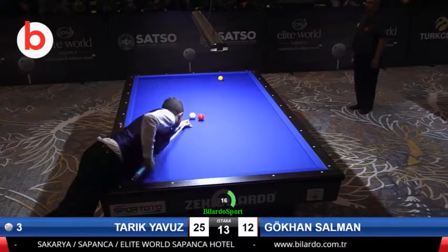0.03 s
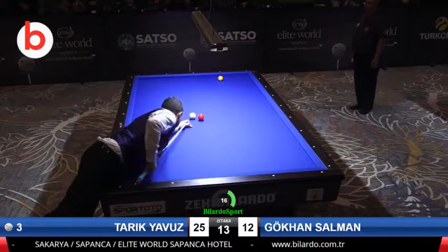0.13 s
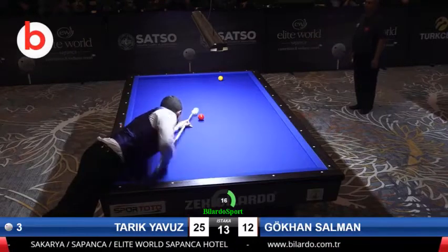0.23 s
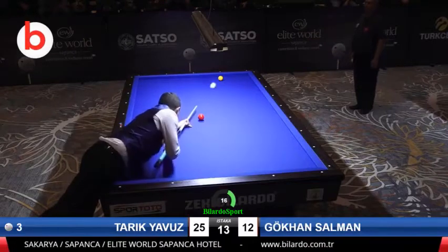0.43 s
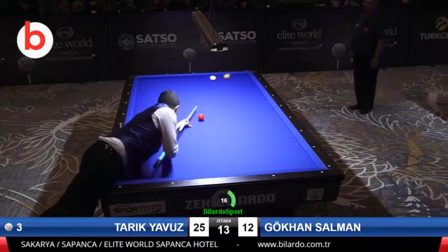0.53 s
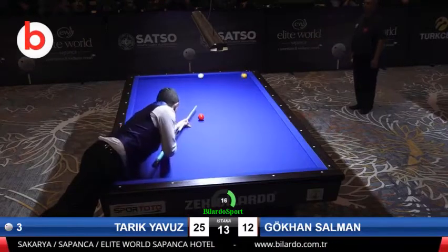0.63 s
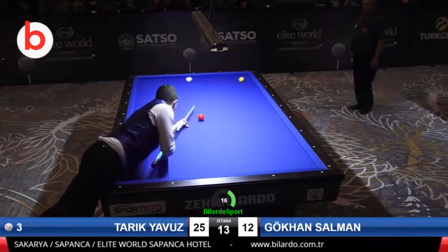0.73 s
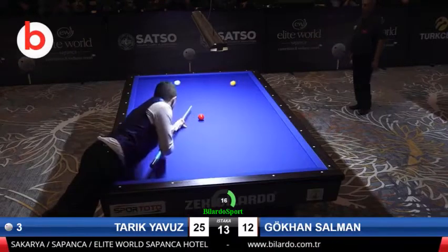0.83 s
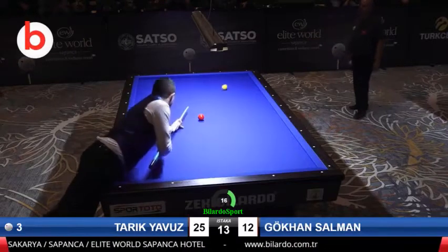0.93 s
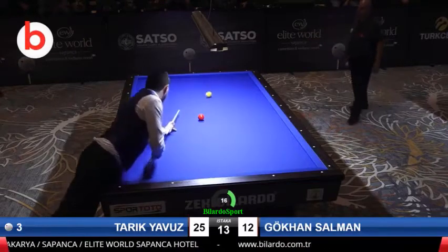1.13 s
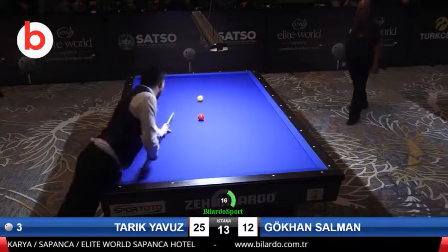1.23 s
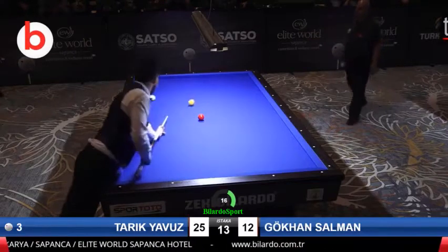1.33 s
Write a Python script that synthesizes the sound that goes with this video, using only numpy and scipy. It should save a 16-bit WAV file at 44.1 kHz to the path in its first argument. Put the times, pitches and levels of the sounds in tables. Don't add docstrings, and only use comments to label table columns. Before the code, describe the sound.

Cue tip knocks a billiard ball, then two balls click sharply in a quiet, echoing hall

```python
import sys
import numpy as np
from scipy import signal
from scipy.fft import rfft, irfft, next_fast_len
from scipy.io import wavfile
from scipy.ndimage import uniform_filter1d

SR = 44100
rng = np.random.default_rng(int(sys.argv[2]) if len(sys.argv) > 2 else 0)


def log_audio(samples):
    frames = np.atleast_2d(samples).T
    limited = np.clip(frames, -1, 1)
    pcm = np.round(limited * 32767).astype(np.int16)
    wavfile.write(sys.argv[1], SR, pcm)


def magnitude_from_level(level_db):
    exponent = np.asarray(level_db, float) / 20
    return 10 ** exponent


N = 61739

# (freq [Hz], density [dB per Hz])
HISS_SPECTRUM = [(60, -11), (100, -6), (180, -12), (420, -10), (1200, -27), (2500, -30), (5000, -26.5),
                 (14000, -23.5), (15500, -32.5)]
# (freq [Hz], density [dB])
RUMBLE_SPECTRUM = [(8, -14), (14, -3), (28, -1), (42, -16), (90, -24)]
# (time [s], level [dB])
RUMBLE_DRIFT = [(0, -62), (.5, -66), (1, -64), (1.4, -59)]
# (freq [Hz], density [dB])
MURK_SPECTRUM = [(300, -11), (700, -9.5), (1300, -10), (2000, -11), (2450, -7), (2900, -13), (4000, -35)]
# (freq [Hz], t60 [s])
HALL_DECAY = [(150, .85), (600, 1.2), (1500, 1.05), (2500, 1.08), (4000, .9), (7000, .6), (14000, .5)]
# (freq [Hz], density [dB per Hz])
CUE_HALL_SPECTRUM = [(110, -43), (180, -12), (400, -2), (1200, -3), (2000, -16), (4000, -20), (12000, -33),
                     (15500, -37)]
# (freq [Hz], density [dB per Hz])
BALL_HALL_SPECTRUM = [(300, -42), (800, -14), (1400, -1), (2300, 1.5), (3600, -8.5), (5000, -38.5),
                      (12000, -38), (16000, -40)]
# (freq [Hz], density [dB per Hz])
CUSHION_SPECTRUM = [(120, -28.5), (200, -3), (330, -2), (700, -14), (1000, -9), (1500, 16)]
# (freq [Hz], width [Hz], gain [dB])
SHAFT_MODES = [(194, 49, 9.5), (312, 180, -6.5), (464.4, 51, 5.5), (712, 30, 10), (1220, 30, 0),
               (1730, 60, 8), (2100, 50, 5), (2450, 130, 8), (4500, 280, -7), (5830, 730, 4.5),
               (6910, 470, -10.5), (7990, 2100, 5), (14200, 400, -1.5), (14800, 300, 8.5)]
# (freq [Hz], width [Hz], gain [dB])
SPHERE_LOBES = [(6000, 500, 3), (7500, 700, -25), (9300, 600, 4), (10500, 400, -16), (12300, 800, 4),
                (13800, 350, -16), (15000, 500, 3)]
# (time [s], level [dB], build-up [ms], extra early level [dB], early t60 [ms])
HALL_ANSWERS = [
    (0.22, -23, 9, 7, 110),
    (.52, -22.5, 7, -2, 60),
    (0.586, -42.5, 23.7, 19, 210),
]
# (freq [Hz], level [dB])
CUE_KNEE = [(150, -67), (500, -61), (900, -58), (1500, -62.5), (2500, -66), (3700, -66.5), (5500, -71),
            (14000, -87)]
# (freq [Hz], level [dB])
BALL_KNEE = [(150, -70), (500, -63), (900, -56), (1500, -53), (2500, -57), (3700, -64), (5500, -88),
             (14000, -90)]
# (freq [Hz], density [dB])
CRACK_SPECTRUM = [(1500, -21), (4000, -4), (8000, -12.5), (13000, -11), (15000, -16), (16500, -39)]
# (time [s], level [dB], t60 [ms], lead-in level [dB], top [Hz])
CRACK_EVENTS = [
    (.2178, -24, 16, -9, 16000),
    (.2212, -15, 8, -14, 13500),
    (.2395, -27, 30, -9, 13000),
    (.2475, -27, 30, -9, 13000),
    (.5116, -17, 6, -17, 13800),
    (.5232, -15, 4, -22, 16500),
    (.529, -33, 8, -9, 16000),
]
# (time [s], peak [dB], pitch [Hz], rise [ms], t60 [ms])
CUE_RINGS = [(.2172, -11, 1050, .3, 12), (.2197, -2, 870, .3, 25), (.2232, -5, 1080, .8, 16),
             (.2273, -9, 1000, 1, 25), (.2304, 8, 640, 2, 12), (.2172, -19, 2450, .6, 35),
             (.218, -9, 5000, 1.2, 10), (.2075, -31, 850, 2, 200), (.2255, -22, 3040, 1.1, 16),
             (.2195, -14, 430, 3.1, 70), (.2385, -13, 800, 1.2, 14), (.2475, -12, 950, 1.1, 12)]
# (time [s], peak [dB], pitch [Hz], hold [ms], t60 [ms])
BALL_BURSTS = [(.51147, -2.5, 2360, 2.7, 2.5), (.51147, -6, 2600, .7, 4), (.5205, -17, 1800, 1, 6),
               (.5231, -2, 2850, .7, 5), (.5236, -12, 2200, 1.5, 12), (.529, -14, 3000, 1.2, 12),
               (.5148, -17, 2900, .8, 8), (.507, -26, 2100, 4, 3), (.5108, -16, 2500, .6, 2),
               (.5335, -15, 1700, 1.5, 9), (.5125, -16, 1300, 2.1, 4), (.5112, -46, 160, 3.1, 9)]

STREAK_DB = 6


def unit(x):
    return x / np.sqrt(np.mean(x ** 2) + 1e-20)


def along(points, hz, outside=None):
    f, v = np.transpose(points)
    return np.interp(np.log(hz + 1), np.log(f + 1), v, outside, outside)


def since(start_s):
    return np.maximum(np.arange(N) / SR - start_s, 0)


def fall_db(t_s, t60_ms):
    return 60 * 1e3 * t_s / t60_ms


def filtered(x, response):
    m = next_fast_len(N + SR // 2)
    hz = np.fft.rfftfreq(m, 1 / SR)
    return irfft(rfft(x, m) * response(hz), m)[..., :N]


def smoothed(x, bins, frames):
    return uniform_filter1d(uniform_filter1d(x, size=bins, axis=0), size=frames, axis=1)


def noise(spectrum, side_db, lines=()):
    def gain(hz):
        bells_db = sum(db * np.exp(-((hz - center) / width) ** 2) for center, width, db in lines)
        return magnitude_from_level(along(spectrum, hz, -120) + bells_db)

    mid, side = unit(filtered(rng.standard_normal((2, N)), gain))
    side = magnitude_from_level(side_db) * side
    return np.array([mid + side, mid - side])


def streaked(x, depth_db):
    z = signal.stft(x, nperseg=1024)[2]
    field = unit(smoothed(rng.standard_normal(z.shape[1:]), 2, 9))
    return unit(signal.istft(z * magnitude_from_level(depth_db * field), nperseg=1024)[1][:, :N])


def placed(x, lag_s, pan_db):
    half = np.array([[.5], [-.5]])
    return filtered(x, lambda hz: magnitude_from_level(half * pan_db) * np.exp(-2j * np.pi * hz * half * lag_s))


def noise_floor():
    s, db = np.transpose(RUMBLE_DRIFT)
    rumble_db = np.interp(np.arange(N) / SR, s, db)
    rumble = magnitude_from_level(rumble_db) * noise(RUMBLE_SPECTRUM, side_db=-28.5)
    t = since(.3)
    murk_t60_s = 5
    murk_level = magnitude_from_level(-73.5 - 60 * (t - .7) / murk_t60_s) * (t > 0)
    murk = murk_level * streaked(noise(MURK_SPECTRUM, side_db=-10.5), STREAK_DB)
    hiss = magnitude_from_level(-71) * streaked(noise(HISS_SPECTRUM, side_db=-3.5), STREAK_DB)
    return hiss + rumble + murk


def hall(spectrum, lines, start_s, level_db, build_ms, early_db, early_t60_ms):
    patchy_db, streak_db, side_db = 1, 1.2, -12
    source = streaked(noise(spectrum, side_db, lines), streak_db)
    hz, t, z = signal.stft(source, SR, nperseg=256)
    lumps = unit(smoothed(rng.standard_normal(z.shape[1:]), 6, 2))
    t60_s = along(HALL_DECAY, hz)[:, None]
    z = z * magnitude_from_level(patchy_db * lumps - 60 * np.maximum(t - start_s, 0) / t60_s)
    tail = signal.istft(z, SR, nperseg=256)[1][:, :N]
    t = since(start_s)
    build = 1 - np.exp(-(1e3 * t / build_ms) ** 2)
    early = 1 + magnitude_from_level(early_db - fall_db(t, early_t60_ms))
    return magnitude_from_level(level_db) * build * early * tail


def gated(x, knee):
    steepness, depth_db = 2.3, -30
    hz, t, z = signal.stft(x, SR, nperseg=512, noverlap=384)
    power = np.abs(smoothed(np.mean(np.abs(z) ** 2, 0), 7, 21))
    knee_power = magnitude_from_level(2 * along(knee, hz))[:, None]
    gain = 1 / (1 + (knee_power / (power + 1e-20)) ** steepness) + magnitude_from_level(depth_db)
    return signal.istft(z * gain, SR, nperseg=512, noverlap=384)[1][:, :N]


def suppressed_tails():
    cue_tail = hall(CUE_HALL_SPECTRUM, SHAFT_MODES, *HALL_ANSWERS[0])
    ball_tail = hall(BALL_HALL_SPECTRUM, SPHERE_LOBES, *HALL_ANSWERS[1])
    cushion_tail = hall(CUSHION_SPECTRUM, (), *HALL_ANSWERS[2])
    tails = gated(cue_tail, CUE_KNEE) + gated(ball_tail + cushion_tail, BALL_KNEE)
    return placed(tails, lag_s=0, pan_db=-.98)


def cracks():
    lead_t60_ms = 17
    t, x = np.arange(N) / SR, 0
    for start_s, db, t60_ms, lead_db, top_hz in CRACK_EVENTS:
        after_db = db - fall_db(t - start_s, t60_ms)
        before_db = db + lead_db - fall_db(start_s - t, lead_t60_ms)
        shape = magnitude_from_level(np.where(t > start_s, after_db, before_db))
        tick = shape * noise(CRACK_SPECTRUM, side_db=-15)
        x = x + filtered(tick, lambda hz: 1 / (1 + (hz / top_hz) ** 30))
    return x


def cue():
    x = 0
    for start_s, db, hz, rise_ms, t60_ms in CUE_RINGS:
        t = since(start_s)
        swell = 1 - np.exp(-(1e3 * t / rise_ms) ** 2)
        x = x + magnitude_from_level(db - fall_db(t, t60_ms)) * swell * np.sin(2 * np.pi * hz * t)
    return placed(x, lag_s=30e-6, pan_db=-.8)


def balls():
    rise_s = .0002
    x = 0
    for start_s, db, hz, hold_ms, t60_ms in BALL_BURSTS:
        t = since(start_s)
        decay = magnitude_from_level(db - fall_db(since(start_s + hold_ms / 1e3), t60_ms))
        x = x + decay * (1 - np.exp(-t / rise_s)) * np.sin(2 * np.pi * hz * t)
    return placed(x, lag_s=5e-6, pan_db=-.8)


def scene():
    return noise_floor() + suppressed_tails() + cracks() + cue() + balls()


def top_cut(x):
    return signal.sosfilt(signal.butter(12, 16970, fs=SR, output="sos"), x)


def record(dry):
    clip_top, clip_hardness = .6, 5
    top_hz, top_width_hz = 16300, 130
    x = dry / (1 + np.abs(dry / clip_top) ** clip_hardness) ** (1 / clip_hardness)
    x = filtered(x, lambda hz: .5 - .5 * np.tanh((hz - top_hz) / top_width_hz))
    return top_cut(x)


dry = scene()
out = record(dry)
log_audio(out)
```